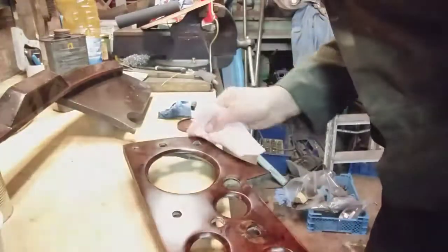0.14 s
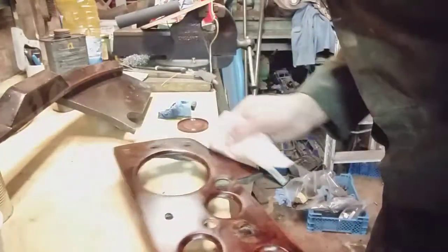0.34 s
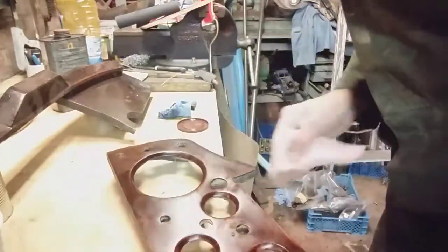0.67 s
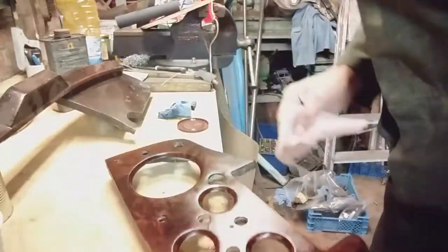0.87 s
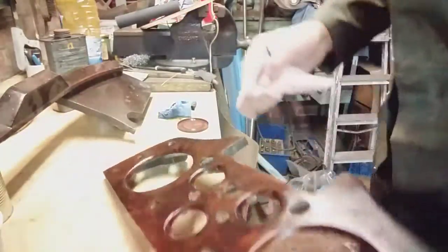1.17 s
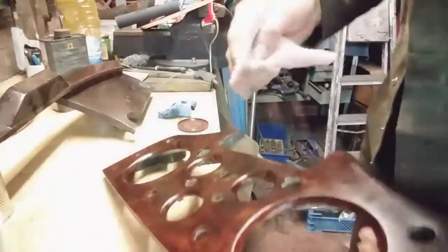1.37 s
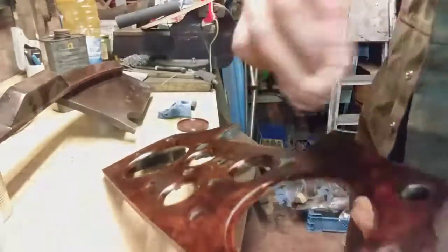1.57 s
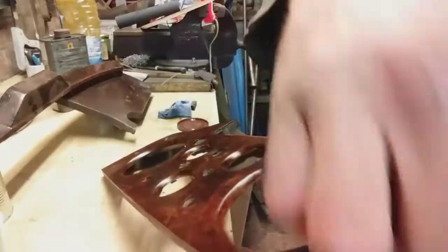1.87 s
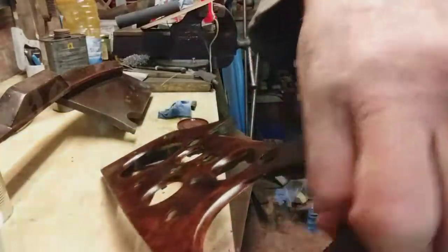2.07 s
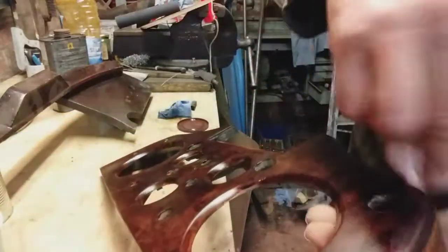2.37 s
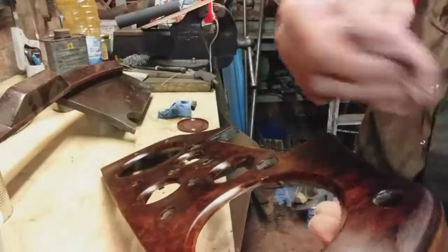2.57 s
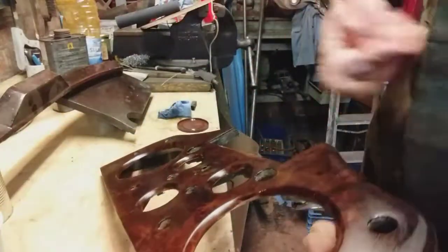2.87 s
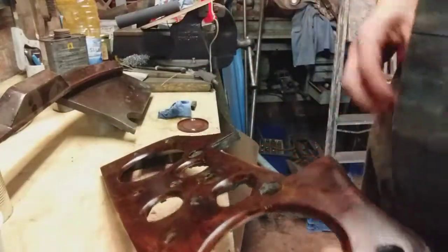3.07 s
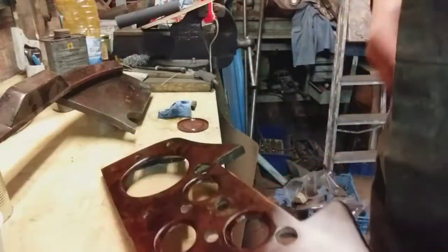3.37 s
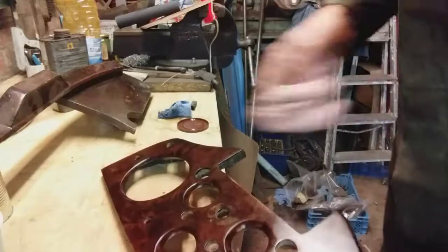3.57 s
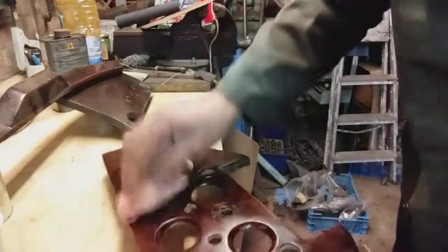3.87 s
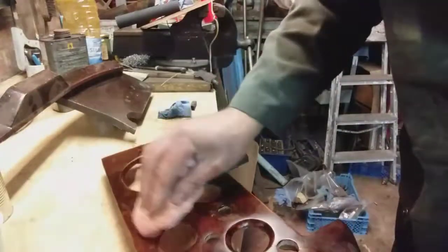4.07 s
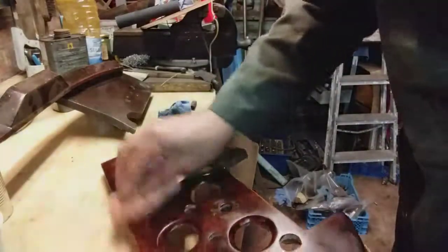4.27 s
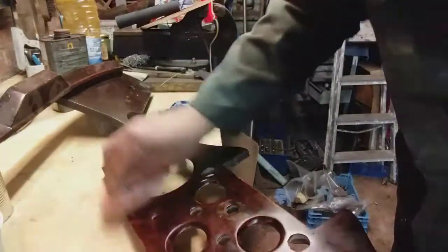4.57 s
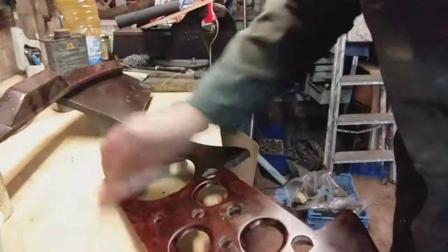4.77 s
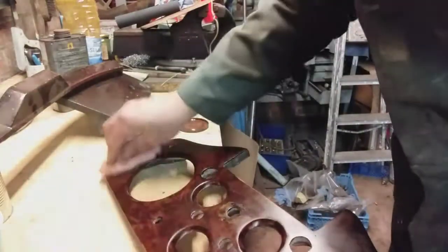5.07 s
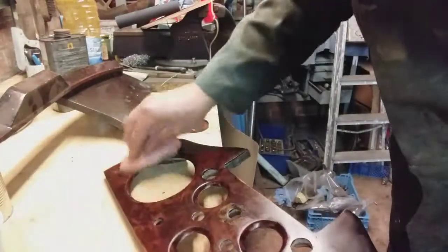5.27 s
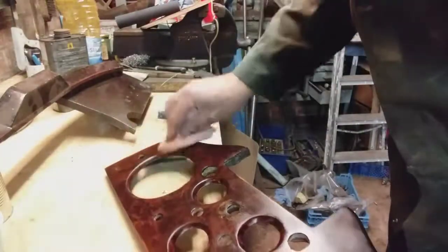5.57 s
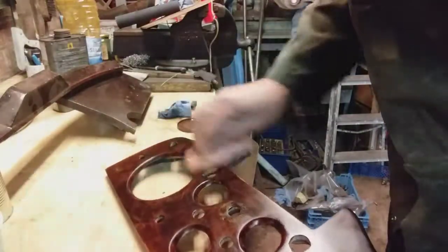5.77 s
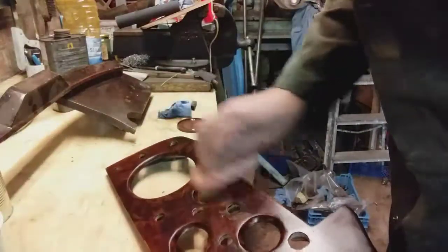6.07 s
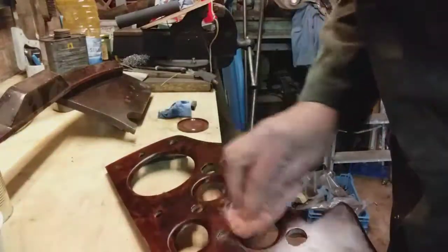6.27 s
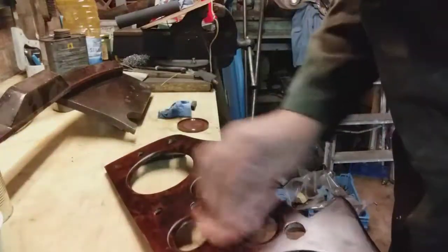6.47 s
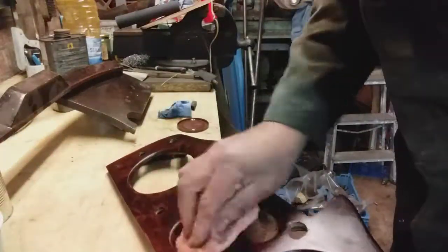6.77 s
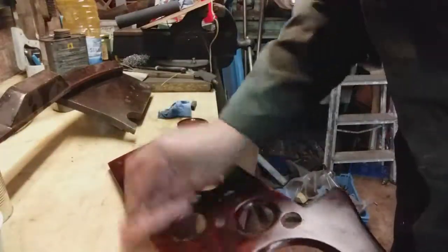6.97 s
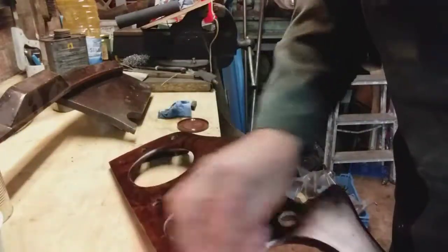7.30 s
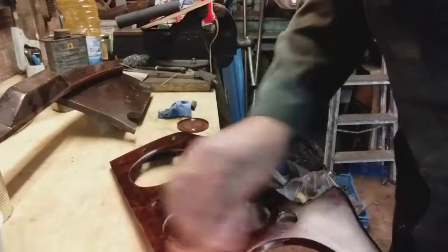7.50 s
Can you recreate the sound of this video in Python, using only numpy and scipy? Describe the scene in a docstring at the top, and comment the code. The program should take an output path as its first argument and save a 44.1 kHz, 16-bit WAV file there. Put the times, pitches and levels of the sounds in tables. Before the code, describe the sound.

Soft cloth swipes, a sharp double wooden clatter, then steady scratchy polishing with light knocks and ticks in a small room.

```python
"""In a small workshop, close to a phone, a hand wipes a varnished wooden panel with a rag.
The cloth is shaped noise that hisses along each stroke and dips where it turns or slackens, with four squeaks.
The loose panel knocks and scrapes on the bench: blows and rough sliding excite one set of decaying modes.
Ticks and small dull knocks are short noise bursts; dense late reflections and a low room rumble surround all."""
import sys
import numpy as np
from scipy import signal
from scipy.fft import rfft, irfft, next_fast_len
from scipy.io import wavfile
from scipy.ndimage import uniform_filter1d

SR = 44100
rng = np.random.default_rng(int(sys.argv[2]) if len(sys.argv) > 2 else 0)


def natural_amplitude(level_db):
    """Convert a level in decibels to a linear amplitude factor, elementwise."""
    exponent = np.asarray(level_db, float) / 20
    return 10 ** exponent


def dump(signal):
    """Clip the signal to [-1, 1] and save it as 16-bit WAV at the path in sys.argv[1]."""
    limited = np.clip(np.atleast_2d(signal).T, -1, 1)
    pcm = np.round(limited * 32767).astype(np.int16)
    wavfile.write(sys.argv[1], SR, pcm)


N = 336924
T = np.arange(N) / SR  # time/s

# room noise spectrum: f/Hz, relative density/dB per Hz
RUMBLE_SPECTRUM = [(18, -42.5), (35, -16), (52, 3.5), (95, 3), (160, -0.5), (210, -11), (400, -24),
                   (1000, -23), (1900, -25), (4000, -18.5), (7800, -22), (9200, -33), (15500, -30.5)]
# decay of the room: f/Hz, T60/s
ROOM_DECAY = [(300, 0.58), (600, 0.24), (1500, 0.27), (3000, 0.29), (8000, 0.2)]
# ticks and small dull knocks, bursts of noise that are high and narrow or low and broad:
# t/s, level/dB (the sum is halved later), band centre f/Hz, T60/s, broad snap re ring/dB
SMALL_BURSTS = [(1.993, -42, 4260, 0.024, -5), (2.0857, -38, 3020, 0.034, -8),
                (2.1008, -37.5, 4300, 0.046, -3), (2.4535, -33.5, 4240, 0.048, -9),
                (3.042, -38, 4500, 0.039, 0.5), (3.1237, -43.5, 3350, 0.035, -3),
                (3.2782, -41.5, 4970, 0.027, 0), (3.6335, -47.5, 6500, 0.036, 3.5),
                (4.9194, -40.5, 1638, 0.027, 0), (6.4765, -36, 2200, 0.042, 3.5),
                (6.5315, -30.5, 5450, 0.032, -5), (6.962, -39, 2243, 0.017, 7),
                (7.229, -31, 2940, 0.021, -3), (7.2306, -32, 1190, 0.03, -6),
                (7.4053, -37.5, 1815, 0.028, 7.5)]
# brief breathy whistles of cloth on varnish: t/s, length/s, f/Hz, bandwidth/Hz, level/dB
SQUEAKS = [(0.152, 0.082, 1440, 300, -65), (1.836, 0.056, 698, 83.7, -61), (4.525, 0.016, 1310, 298, -56.5),
           (6.229, 0.2, 1620, 444, -61)]
# modes of panel and bench when struck: f/Hz, level/dB, T60/s
MODES = [(88, -5.5, 0.12), (122, 10, 0.21), (182, 14, 0.15), (215, 3, 0.29), (268, -2.5, 0.18),
         (370.3, -1.5, 0.076), (443, -8.5, 0.08), (515, -9.5, 0.11), (561.4, -9, 0.11), (633, -11.5, .06),
         (694, 2, 0.063), (708, -2.5, .05), (857, -1, 0.053), (884, 7.5, 0.039), (945, 6.5, 0.045),
         (1054.4, 8, .05), (1125, 8.5, 0.036), (1255, 8.5, 0.037), (1350, 6, 0.033), (1511, 7, .035),
         (1688, 1.5, 0.036), (1810, 0.5, 0.017), (2050, 0, 0.02), (2226, -1, 0.035), (2350, -1.5, 0.021),
         (2564, -1.5, 0.027), (2950, -1, .02), (3493, -8.5, 0.012)]
# panel knocks on the bench: t/s, level/dB, hard-edge weight of high modes/dB,
# thump weight of low modes/dB, share of the free ring that the hands allow/1
KNOCKS = [(1.1237, -5, -2.5, -17.5, 0.99), (1.128, -7.5, -8.5, -14, 0.73), (1.157, -15, -16, -24, 0.72),
          (1.162, -12.5, -11, -18.5, 0.94), (1.179, -21.5, -24, -20, 0.8), (1.209, -30, -8, -11, 1),
          (1.299, -37, -7, -6, 0.7), (1.376, -41, -17.5, -12.5, 1), (1.985, -45.5, -14.5, -1, 0.97),
          (2.233, -27, -25.5, -12.5, 0.71), (2.249, -34.5, -30.5, -22, 0.78), (3.401, -46, -17, -10, 0.74),
          (3.979, -57, -12.5, -14, 0.63), (4.723, -34, -17, -7, 0.99), (5.021, -18.5, -15, -18.5, 0.84),
          (5.039, -24, -29, -26, 0.63), (5.21, -36, -28, -14, 0.79), (5.335, -45.5, -13.5, 2.5, 1),
          (5.4644, -19, -10, -16.5, 0.95), (5.479, -19.5, -22, -20, 0.58), (5.73, -28.5, -21, -12, 0.95),
          (5.744, -41, -25, -21.5, 0.73), (5.824, -29, -30, -0.5, 0.58), (6.036, -33, -17, -3.5, 0.7),
          (6.264, -30.5, -16.5, -13, 1), (6.299, -39, -8, -6, 0.86), (6.374, -18, -16, -19, 0.77),
          (6.411, -49, -29, -1, 0.78), (6.444, -53, -3, -22, 0.9), (6.474, -34, -8, -16, 0.8),
          (6.561, -38, -19, 5, 0.93), (6.83, -41.5, -6, -18, 1), (6.909, -45, -6, -13, 0.9),
          (6.945, -37, -6, -4, 1), (7.307, -42.5, -17, 4, 0.94), (7.384, -37, -11, 3, 0.84)]
# scuffs of wood on wood and hand: peak t/s, rise/s, fall/s, upper scrape level/dB, lower scrape level/dB
SCUFFS = [(.434, .06, 0.072, -51, -67.5), (.648, 0.12, 0.13, -59, -60), (1.0, 0.17, 0.32, -65.5, -72),
          (1.4, 0.17, 0.065, -66, -60.5), (1.7, 0.22, .2, -69, -66), (1.84, .06, 0.076, -65.5, -60),
          (2.0, 0.39, 0.27, -65, -66), (2.35, 0.066, .07, -66.5, -53.5), (2.49, 0.056, 0.086, -60.5, -57.5),
          (2.761, 0.086, 0.061, -70, -91), (2.9, 0.082, .15, -83, -62.5), (3.01, 0.095, 0.19, -56.5, -55.5),
          (3.4, 0.24, 0.13, -63, -66), (3.65, .05, 0.53, -64, -68), (3.94, .5, 0.36, -65.5, -63.5),
          (4.25, .08, 0.076, -62, -71), (4.43, .12, .1, -61.5, -71.5), (4.535, 0.026, 0.053, -61.5, -70),
          (4.79, 0.16, 0.056, -61.5, -62), (4.935, 0.054, 0.056, -57, -56.5), (5.2, .3, 0.14, -63.5, -61.5),
          (5.36, .08, 0.076, -64.5, -69), (5.61, 0.21, 0.089, -57, -60.5), (5.881, 0.21, 0.084, -66, -66.5),
          (6.02, 0.036, 0.094, -63, -59), (6.18, 0.047, 0.22, -62.5, -64), (6.5, 0.46, 0.26, -58.5, -60),
          (6.726, 0.11, 0.12, -57, -56), (6.868, 0.066, 0.028, -50, -53), (6.96, 0.084, 0.18, -49, -46.5),
          (7.057, .02, 0.064, -53.5, -51), (7.15, 0.041, 0.084, -57.5, -60.5),
          (7.274, 0.082, 0.054, -46.5, -51), (7.375, .03, 0.034, -55, -55),
          (7.424, 0.066, 0.059, -50.5, -52), (7.533, 0.044, 0.11, -58.5, -62.5)]
# levels between scuffs: upper scrape/dB, lower scrape/dB
SCUFF_REST = (-83, -86)
# spectrum of cloth hiss: f/Hz, relative density/dB per Hz
CLOTH_SPECTRUM = [(1060, -37.5), (1800, -13.5), (2400, -10.5), (3540, -4.5), (3840, -1.5), (5160, -1),
                  (5910, -3), (7610, -1), (8100, -2.5), (9190, -14), (10500, -4), (11900, -9.5),
                  (14800, -15.5), (15500, -14)]
# turns and brief slackenings of the polishing stroke:
# t/s, dip depth/dB, dip length/ms, hiss arriving/dB, hiss leaving/dB
STROKE_DIPS = [(4.06, 23.5, 52, -51, -49.5), (4.196, 19, 28, -49, -48), (4.336, 16, 11, -54, -52.5),
               (4.46, 25, 18, -49.5, -49), (4.623, 11, 12, -58, -54.5), (4.751, 15.5, 16, -49, -51.5),
               (4.845, 2.5, 55, -56.5, -53), (4.94, 17, 17, -53, -51), (5.057, 12, 15, -54, -55.5),
               (5.188, 13, 20, -50, -50), (5.425, 8.5, 46, -52.5, -49), (5.53, 4.5, 55, -51, -54.5),
               (5.69, 4.5, 69, -54, -54), (5.803, 12, 16, -52.5, -52.5), (5.925, 10, 12, -57.5, -58.5),
               (6.079, 9.5, 28, -49, -54), (6.199, 8.5, 21, -51, -53), (6.339, 13, 33, -49, -51),
               (6.607, 21, 20, -49, -49.5), (6.77, 1, 55, -50.5, -53.5), (6.877, 11, 36, -46, -45),
               (7.03, 2, 30, -51, -51), (7.187, 16, 26, -53, -54), (7.303, 11, 17, -50.5, -51.5),
               (7.541, 13, 14, -54, -50), (7.7, 10, 14, -58, -55)]
# quiet shifting of the rag in the hand, mostly before the polishing: t/s, hiss level/dB
SHIFT = [(0, -67), (.09, -59), (.33, -55), (.75, -58.5), (.84, -92), (.95, -63), (1.03, -60.5), (1.11, -67),
         (1.5, -86), (1.65, -72.5), (1.96, -65), (2.15, -56), (2.44, -59.5), (2.53, -67.5), (2.92, -68.5),
         (3.15, -64.5), (3.3, -64), (3.55, -74), (3.66, -67.5), (4.0, -61.5), (4.06, -73.5), (4.2, -77)]
# short bursts of hiss: swipes of the cloth, and at 1.126 s and 1.165 s the bright hiss of the hard knocks:
# peak t/s, rise/s, fall/s, hiss level/dB, sheen re hiss/dB
HISS_BURSTS = [(.43, 0.086, 0.074, -44.5, -5), (.53, .06, 0.071, -54, -6), (0.684, 0.13, 0.057, -43, -5.5),
               (1.126, 0.0044, 0.033, -45.5, -15), (1.165, 0.0098, 0.053, -44, -14),
               (1.31, 0.025, 0.039, -58, -26), (1.355, 0.019, 0.038, -56.5, -24),
               (1.435, 0.05, 0.036, -57.5, -11.5), (2.01, 0.019, 0.065, -53, -10.5),
               (2.095, .01, 0.038, -52.5, -8), (2.41, 0.065, .05, -66, 5), (2.734, 0.057, .05, -60, -14.5),
               (3.005, 0.06, 0.06, -53.5, -9), (3.055, 0.012, 0.027, -52, -5), (3.1, .02, 0.034, -61, -4.5),
               (3.31, .012, .02, -62, -2.5), (3.404, 0.037, 0.04, -55, -4.5),
               (3.64, .01, 0.035, -62.5, -8.5), (3.99, 0.035, .03, -68, -4)]


def unit(x):
    """Normalisation: scale to rms 1."""
    return x / np.sqrt(np.mean(x ** 2))


def colour(x, table):
    """Spectral shaping: weight a noise by points of f/Hz and dB, joined on a log frequency axis."""
    hz, db = np.transpose(table)
    size = next_fast_len(len(x))
    f = np.maximum(np.arange(size // 2 + 1) * SR / size, 1)
    gain = natural_amplitude(np.interp(np.log(f), np.log(hz), db))
    return irfft(rfft(x, size) * gain, size)[:len(x)]


def band(x, lo_hz, hi_hz, order=2):
    """Band limitation: Butterworth band-pass."""
    sos = signal.butter(order, [lo_hz, min(hi_hz, .45 * SR)], "band", fs=SR, output="sos")
    return signal.sosfilt(sos, x)


def decay(t, t60):
    """Exponential damping: the amplitude falls by 60 dB in t60."""
    return np.exp(-np.log(1000) * t / t60)


def walk(rate):
    """Random modulation: levels held 1 / rate s and smoothed twice; spread near 1."""
    k = int(SR / rate)
    held = np.repeat(rng.standard_normal(N // k + 1), k)
    return 1.3 * uniform_filter1d(uniform_filter1d(held, k), k)[:N]


def grit(spread_db):
    """Stick-slip friction: dense slips, a noise whose single samples have a long tail of sizes."""
    return unit(rng.standard_normal(N) * natural_amplitude(spread_db * rng.exponential(size=N)))


def swell(s, rise, fall, shape):
    """Power envelope peaking at s, near -20 dB after rise or fall; shape 1 is a sharp tip, 2 a round top."""
    return np.exp(-4.6 * np.abs((T - s) / np.where(T < s, rise, fall)) ** shape)


def add(out, s, x):
    """Superposition: mix a short sound in at time s."""
    i = int(s * SR)
    out[i:i + len(x)] += x[:N - i]


def rumble():
    """Stationary noise: low room rumble with a faint hiss, its level drifting slowly."""
    noise = unit(colour(rng.standard_normal(N), RUMBLE_SPECTRUM))
    return natural_amplitude(-62.5 + 1.3 * walk(2.5)) * noise


def room(x):
    """Reverberation: dense reflections above the bass, longest at the bottom and shortest at the top."""
    t, tail = T[:SR // 2], 0
    hz, t60 = np.transpose(ROOM_DECAY)
    for f in 400 * 2 ** np.arange(0, 5.2, 1 / 3):  # third-octave bands
        fade = decay(t, np.interp(np.log(f), np.log(hz), t60))
        tail = tail + band(rng.standard_normal(len(t)), f / 1.2, f * 1.2, order=1) * fade
    tail = tail * (1 - np.exp(-t / 0.0042))  # the reflections build up over some 4 ms
    return natural_amplitude(-9.5) * signal.oaconvolve(x, tail / np.sqrt(np.sum(tail ** 2)))[:N]


def small_bursts():
    """Damped noise: ticks and small dull knocks, each a band of noise that dies away beside a broad snap."""
    out, t = np.zeros(N), T[:SR // 10]
    noises = rng.standard_normal((len(SMALL_BURSTS), 2, len(t)))
    for (s, level_db, hz, t60, snap_db), noise in zip(SMALL_BURSTS, noises):
        ring = unit(band(noise[0], hz / 1.22, hz * 1.21)) * decay(t, max(t60, .005))
        snap = unit(band(noise[1], 470, 6500, order=1)) * np.exp(-t / 0.0033)
        add(out, s, natural_amplitude(level_db) * (ring + natural_amplitude(snap_db) * snap) / 2)
    return out


def squeaks():
    """Resonance driven by noise: a narrow band that swells and fades."""
    noise = rng.standard_normal(N)
    out = np.zeros(N)
    for s, length, hz, width, db in SQUEAKS:
        envelope = np.exp(-((T - s) / (length / 2)) ** 4)
        out += natural_amplitude(db) * unit(band(noise, hz - width / 2, hz + width / 2)) * envelope
    return out


def knocks():
    """Modal excitation: each blow lands elsewhere, so it shares its push differently among the same modes."""
    out, t = np.zeros(N), T[:SR // 3]
    hz, db, t60 = np.transpose(MODES)[:, :, None]
    chance = rng.standard_normal((len(KNOCKS), 3, len(MODES), 1))
    cracks = rng.standard_normal((len(KNOCKS), SR // 20))
    # a hard edge wakes the high modes, a flat landing the low ones
    high = np.clip(np.log2(hz / 600) / 0.56, 0, 1.6)
    low = np.clip(np.log2(330 / hz) / 0.46, 0, 1)
    for knock, (share, detune, phase), crack in zip(KNOCKS, chance, cracks):
        s, level_db, edge_db, thump_db, free = knock
        gain = natural_amplitude(db + 1.3 * share + high * edge_db + low * thump_db)
        # bending waves fill the panel over a fraction of a cycle or more; a soft contact pushes for longer
        rise = 1 - np.exp(-t / (.35 / hz + 0.00019 * natural_amplitude(-.6 * edge_db)))
        fade = decay(t, t60 * max(free, .2))
        wave = np.sin(2 * np.pi * (hz * (1 + 0.022 * detune) * t + phase))
        ring = (gain * rise * fade * wave).sum(axis=0)
        add(out, s, natural_amplitude(level_db) * ring / np.sqrt(np.sum(gain ** 2)))
        # varnished edges snap at first touch
        snap = unit(band(crack, 1800, 4800)) * np.exp(-t[:len(crack)] / 0.0041)
        add(out, s, natural_amplitude(level_db - 21.5 + 0.77 * edge_db) * snap)
    return out


def scuff_levels():
    """Addition of powers: gains of the upper and lower scrape."""
    power = natural_amplitude(2 * np.array(SCUFF_REST))[:, None]
    for s, rise, fall, upper_db, lower_db in SCUFFS:
        power = power + swell(s, rise, fall, shape=1.19) * natural_amplitude(2 * np.array([[upper_db], [lower_db]]))
    return np.sqrt(power)


def drag():
    """Friction-driven modes: rough sliding excites the panel, its modes broadened by the hand that holds it."""
    high, low = scuff_levels()
    t = T[:SR // 10]
    # the held panel rings half as long, with a quarter of the level contrast in dB between modes
    wood = sum(natural_amplitude(db / 4) * decay(t, .5 * t60) * np.sin(2 * np.pi * hz * t) for hz, db, t60 in MODES)
    rough = signal.oaconvolve(grit(2.2), wood)[:N]
    upper = unit(band(rough, 800, 2100)) * high * natural_amplitude(0.23 * stroke_dip() + 2.4 * walk(30))
    lower = unit(band(rough, 280, 910)) * low * natural_amplitude(2.2 * walk(31))
    return upper + lower


def stroke_dip():
    """Loss of sliding speed: a dip in dB where the rag halts or slows, flat below with quick edges."""
    return -sum(db * np.exp(-np.abs((T - s) / (ms / 2000)) ** 3) for s, db, ms, _, _ in STROKE_DIPS)


def cloth_levels():
    """Addition of powers: gains of hiss, sheen and rasp from polishing, shifting and short bursts."""
    # rows: hiss, sheen re hiss/dB, rasp re hiss/dB
    polish_tint = np.array([[0], [-5], [-11]])
    shift_tint = np.array([[0], [-11.5], [-7.5]])
    s, _, _, arrive_db, leave_db = np.transpose(STROKE_DIPS)
    # the level runs straight in dB from dip to dip, with a step at each
    ends = (s[:, None] + [0, .001]).ravel()
    stroke_db = np.interp(T, ends, np.transpose([arrive_db, leave_db]).ravel())
    power = (T > s[0]) * natural_amplitude(2 * (stroke_db + stroke_dip() + polish_tint))
    power = power + natural_amplitude(2 * (np.interp(T, *np.transpose(SHIFT)) + shift_tint))
    for s, rise, fall, db, sheen_db in HISS_BURSTS:
        tint = np.array([[0], [sheen_db], [-8.5]])
        power = power + swell(s, rise, fall, shape=1.7) * natural_amplitude(2 * (db + tint))
    return np.sqrt(power)


def rag():
    """Friction noise: fibres slip over varnish; the weave makes each band flicker a little on its own."""
    hiss, shine, rasp = cloth_levels()
    # the rag rasps more where the wood scrapes
    rasp = np.hypot(rasp, natural_amplitude(-7.5) * scuff_levels()[0])
    t = T[:SR // 20]
    # bench and tools close by smear each slip and leave fine ripples in its colour
    near = rng.standard_normal(len(t)) * np.exp(-t / .01)
    fibres = colour(grit(1.8), CLOTH_SPECTRUM)
    fibres = fibres + natural_amplitude(-12) * signal.oaconvolve(fibres, near / np.sqrt(np.sum(near ** 2)))[:N]
    body = sum(natural_amplitude(0.68 * walk(25)) * band(fibres, lo, hi, order=3) for lo, hi in [(3100, 5900), (5500, 9300)])
    sheen = natural_amplitude(1.0 * walk(25)) * band(fibres, 12090, 16500, order=3)
    press = natural_amplitude(1.3 * walk(25)) * band(fibres, 1900, 3243, order=3)
    edges = shine * natural_amplitude(1.5 * walk(9.8)) * unit(sheen) + rasp * natural_amplitude(1.5 * walk(8)) * unit(press)
    flicker = natural_amplitude(0.8 * walk(45) + 1.0 * walk(16))
    return flicker * (hiss * unit(body) + edges)


def scene():
    """Direct and reverberant sound: wood fills the room; cloth and small bursts are close and feed it less."""
    wood = knocks() + drag()
    close = rag() + squeaks() + small_bursts()
    return (wood + close + room(wood + natural_amplitude(-6.5) * close) + rumble())[None]


def roll_off(x):
    """The treble ends steeply here."""
    return signal.sosfilt(signal.butter(12, 15890, fs=SR, output="sos"), x)


def record(dry):
    """Band limits of the receiver: the microphone drops the deep bass and the phone cuts the top."""
    thin = signal.sosfilt(signal.butter(3, 48, "high", fs=SR, output="sos"), dry)
    mix = signal.sosfilt(signal.ellip(10, .2, 60, 15500, fs=SR, output="sos"), thin)
    return roll_off(mix)


dry = scene()
out = record(dry)
dump(out)
```